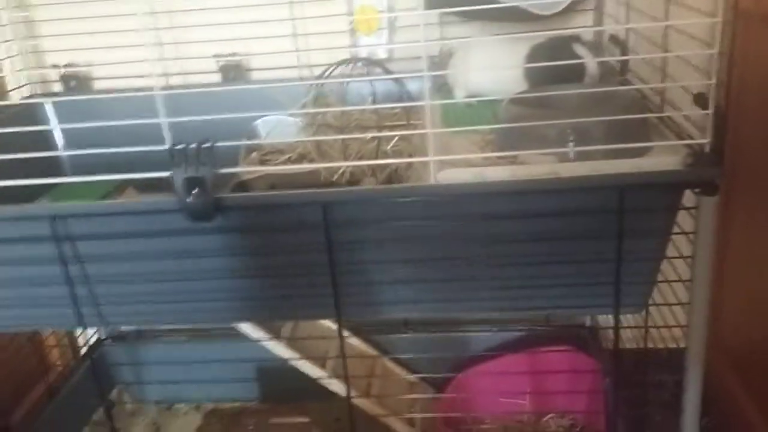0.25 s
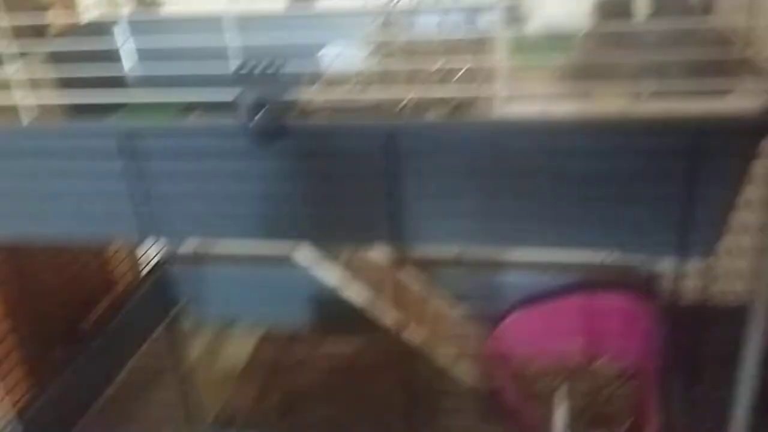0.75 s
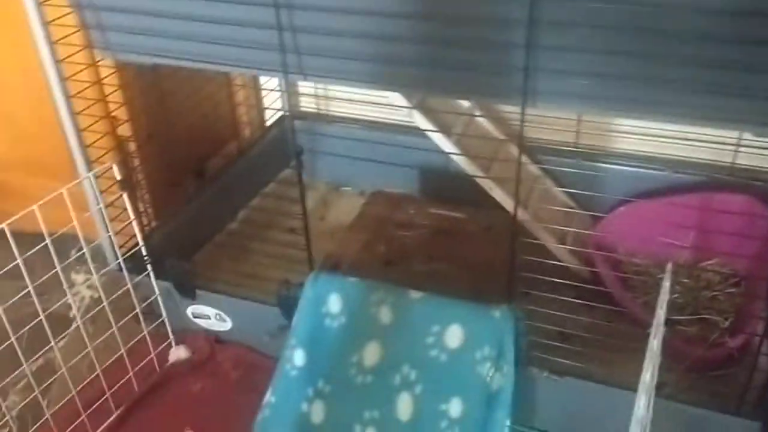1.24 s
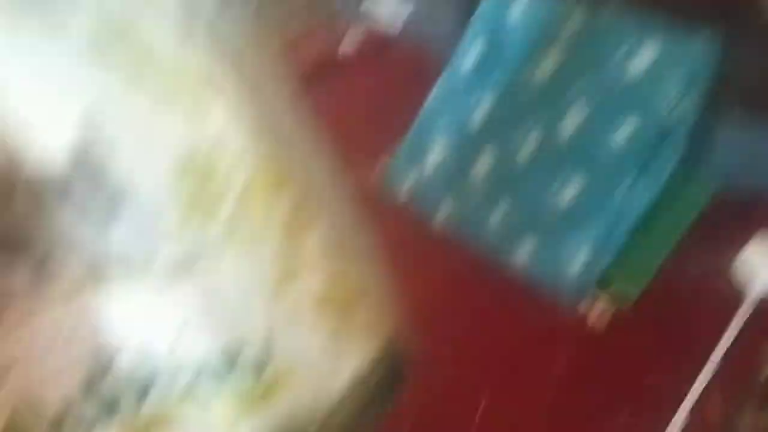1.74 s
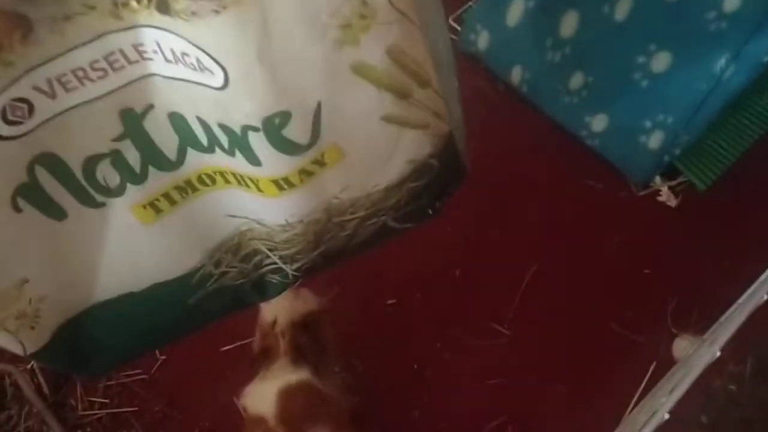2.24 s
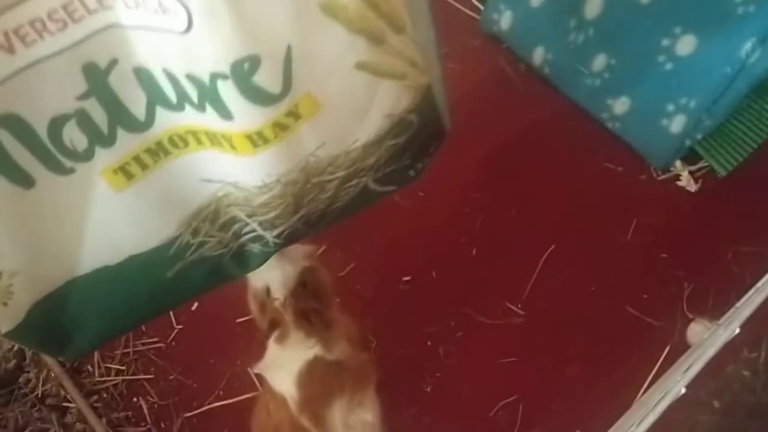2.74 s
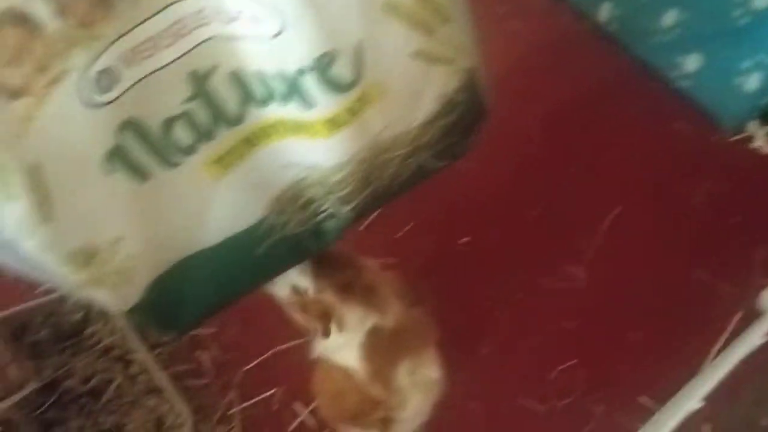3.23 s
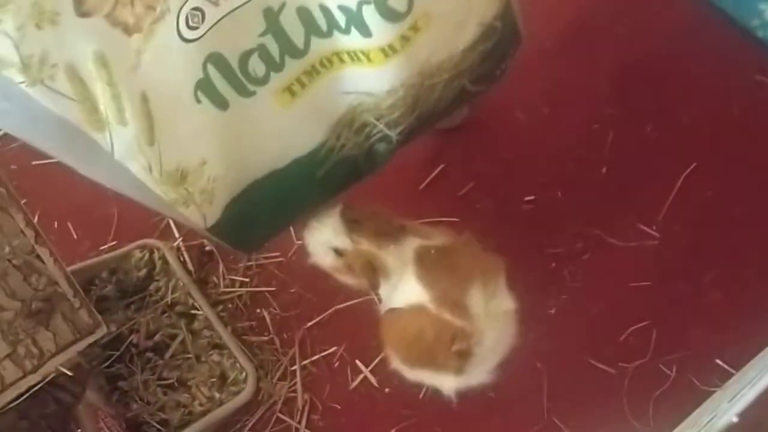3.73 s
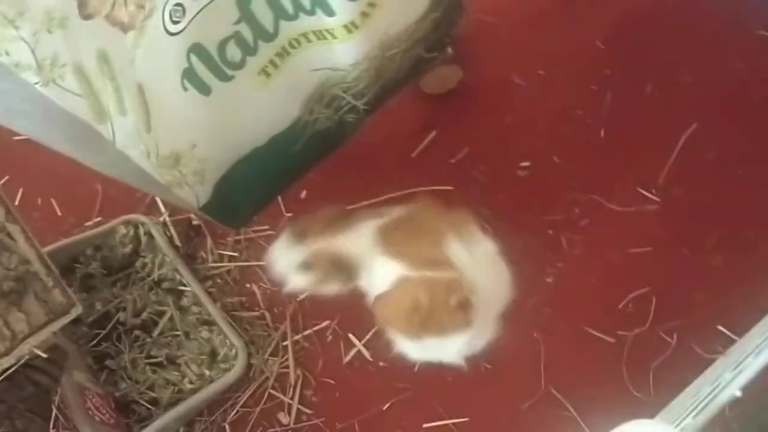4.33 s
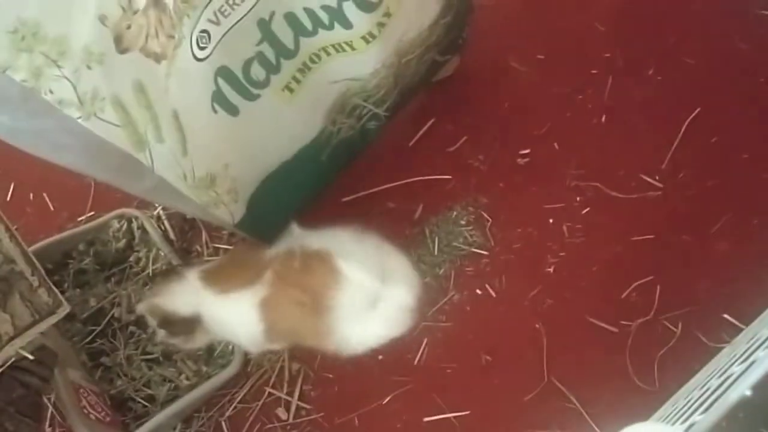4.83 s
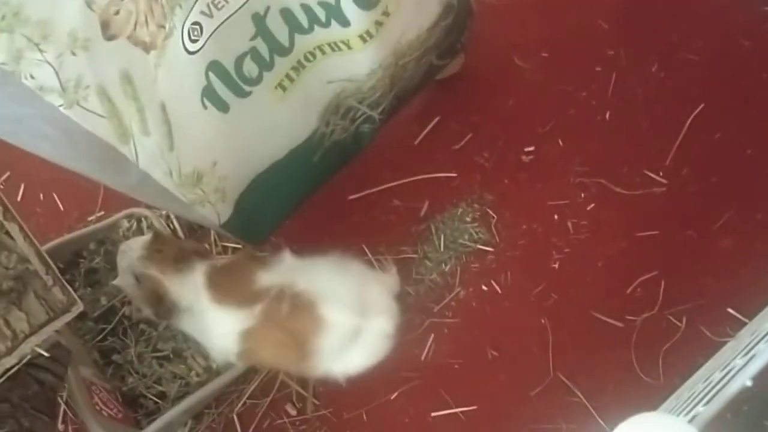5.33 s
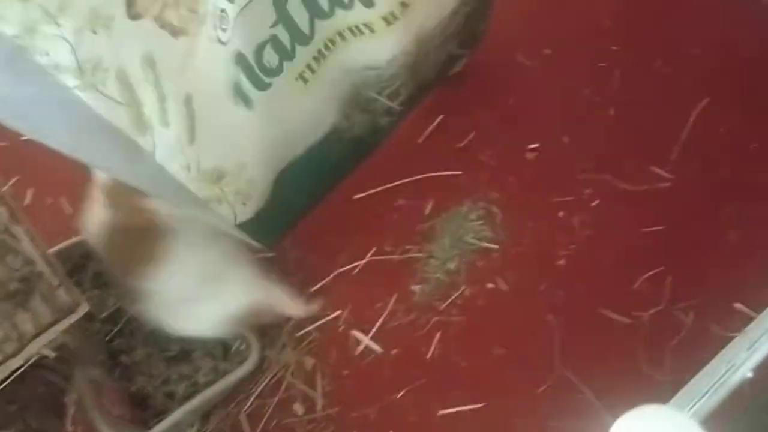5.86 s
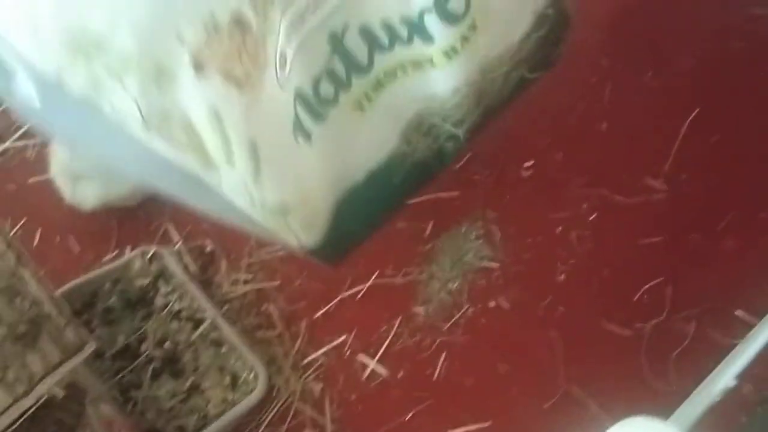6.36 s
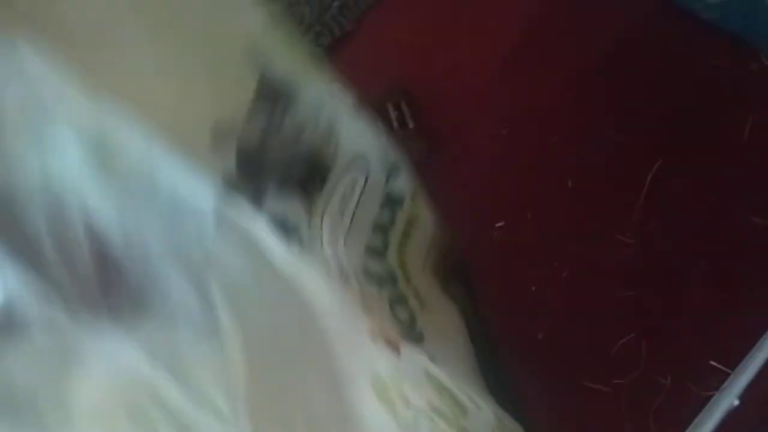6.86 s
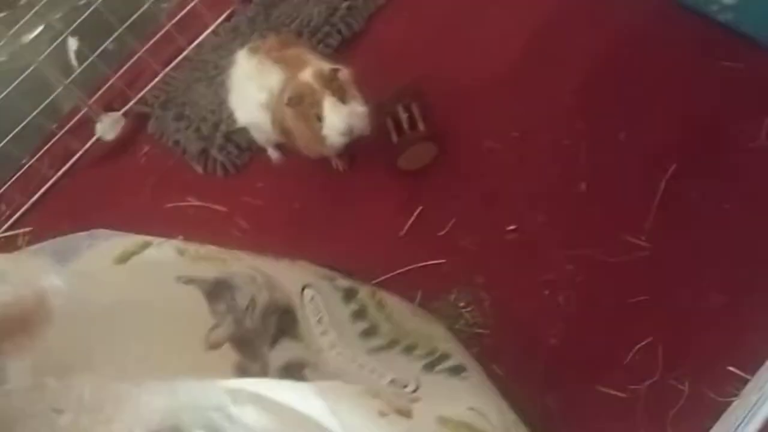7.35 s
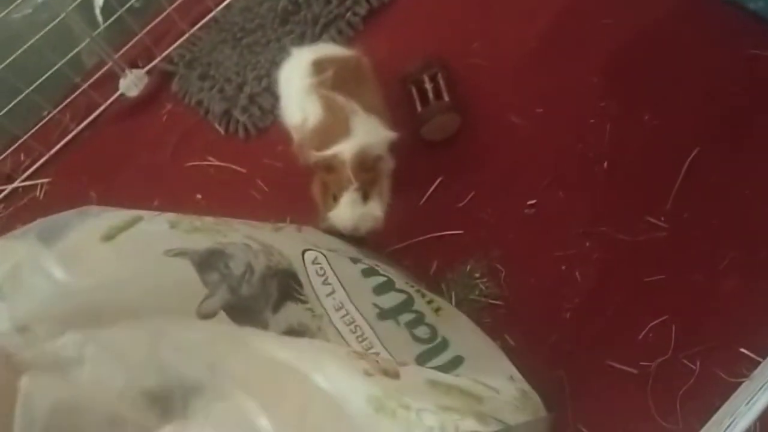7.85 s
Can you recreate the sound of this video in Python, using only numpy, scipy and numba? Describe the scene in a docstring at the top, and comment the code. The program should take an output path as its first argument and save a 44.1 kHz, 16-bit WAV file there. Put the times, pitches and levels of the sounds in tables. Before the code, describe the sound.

A hand-held phone, indoors in a bare room with a short echo. From 0 to 0.65 s, a plastic bag of hay rustles loudly and close, full of sharp dry snaps; it fades by about 0.8 s, leaving near silence over very faint background noise, with small knocks and scuffs until 2 s. Two low, weak grunting calls come at 1.65 and 1.9 s. From 2.4 to 5.6 s, guinea pigs wheek every 0.3 to 0.5 s, each a hoarse grunt sweeping up into a thin whistle that often flips higher; those around 2.5 to 3.5 s are strongest, several later ones fainter. Faint rustling lies underneath. From 5.6 s duller handling and crackles return, with calls at 6.6 and 7.0 s. At 7.15 to 7.3 s the film rasps harshly beside the microphone in two pulls, then bright rustling continues to 8.1 s, with a last squeal at 7.65 s.

```python
"""Hay and a plastic bag rustle and crackle close to a hand-held phone, with soft bumps on the cage floor.
Guinea pigs then wheek for food in a bare, echoing room: harmonics glide up from a hoarse low grunt
to a whistle, which in most calls flips into a higher register. More handling joins in under the calls.
Late on, the bag's film rasps loudly beside the microphone in two stick-slip pulls; then handling and
a last call follow. The echo is decaying noise, and a faint coloured noise lies under everything."""
import sys
import numpy as np
from scipy import signal
from scipy.fft import rfft, irfft, next_fast_len
from scipy.io import wavfile
from scipy.ndimage import uniform_filter1d
from numba import njit

SR = 44100
rng = np.random.default_rng(int(sys.argv[2]) if len(sys.argv) > 2 else 0)


def persist_wave(psi):
    """Save psi, clipped to +-1, as 16-bit WAV."""
    counts = np.round(np.clip(psi, -1, 1) * 32767).astype(np.int16)
    wavfile.write(sys.argv[1], SR, np.atleast_2d(counts).T)


N = 356989
T = np.arange(N) / SR
TOP_HZ = 15700  # nothing sounds above this


def undb(db):
    """Decibels to gain."""
    return 10 ** (np.asarray(db) / 20)


def unit(x):
    """Scale to rms 1."""
    return x / np.sqrt(np.mean(x ** 2))


def at_hz(points, hz):
    """Read (frequency [Hz], value) points on a log-frequency axis."""
    f, value = np.transpose(points)
    return np.interp(np.log(np.maximum(hz, 1)), np.log(f), value)


def colour(x, points):
    """Minimum-phase filter with the given (frequency [Hz], level [dB]) response, made by folding its cepstrum."""
    size = next_fast_len(x.shape[-1] + 4096, True) // 2 * 2
    log_gain = np.log(undb(at_hz(points, np.fft.rfftfreq(size, 1 / SR))))
    cepstrum = irfft(log_gain)
    cepstrum[1:size // 2] *= 2
    cepstrum[size // 2 + 1:] = 0
    response = np.exp(rfft(cepstrum))
    return irfft(rfft(x, size) * response)[..., :x.shape[-1]]


def band(x, lo_hz, hi_hz):
    """Gentle band-pass."""
    edges_hz = [lo_hz, min(hi_hz, SR / 2 - 1)]
    return signal.sosfilt(signal.butter(2, edges_hz, "band", fs=SR, output="sos"), x)


def controls(rows, fade_s):
    """Start time, edge fade and each column of a curve, sample by sample."""
    s, *columns = np.transpose(rows)
    t = np.arange(s[0], s[-1], 1 / SR)
    fade = np.clip(np.minimum(t - t[0], t[-1] - t) / fade_s, 0, 1)
    return (s[0], fade, *(np.interp(t, s, c) for c in columns))


def wander(count, rate):
    """Smooth random motion of rms 1, with `rate` turning points drawn per second."""
    knots = rng.standard_normal(int(count / SR * rate) + 2)
    return unit(np.interp(np.arange(count) / SR * rate, np.arange(len(knots)), knots))


def add(out, x, s, pan_db=0, lag_ms=0):
    """Mix a sound into both channels at time s; pan is left minus right, lag is how late the left is."""
    for channel, side in zip(out, (1, -1)):
        start = max(int((s + side * lag_ms / 2000) * SR), 0)
        part = x[:max(N - start, 0)]
        channel[start:start + len(part)] += part * undb(side * pan_db / 2)


def diffuse(count, alike_hz=550):
    """Noise from all sides: the bass is alike in both channels, the treble unrelated."""
    mid, side = rfft(rng.standard_normal((2, count)))
    alike = 1 / (1 + (np.fft.rfftfreq(count, 1 / SR) / alike_hz) ** 2)
    common = mid * np.sqrt(1 + alike)
    opposed = np.outer([1, -1], side * np.sqrt(1 - alike))
    return irfft(common + opposed, count) / np.sqrt(2)


# colour of the faint background: (frequency [Hz], level [dB])
QUIET_COLOUR = [(18, -45.5), (30, -22), (292, -3), (479, -9), (691, -23.5), (1590, -18), (4910, -23),
                (15500, -26)]


def quiet(level_db=-73):
    """Steady coloured noise from all sides, too faint to notice until the rest falls silent."""
    return unit(colour(diffuse(N), QUIET_COLOUR)) * undb(level_db)


# handling of hay and bag, one curve per stretch:
# (time [s], level of the body before the rustle trim [dB], treble boost [dB])
HANDLING = [
    [(0.0, -26.5, 0.5), (0.062, -38, 3.5), (0.102, -26.5, -0.5), (0.132, -34, -2), (0.418, -35, 0),
     (0.436, -29.5, -5), (0.64, -36.5, -1.5), (0.784, -57.5, 3.5), (0.806, -50.5, 3.5), (1.024, -65.5, 4),
     (1.056, -96, -6), (1.216, -93.5, 9), (1.234, -88, 0), (1.304, -75, -1), (1.408, -56.5, -6),
     (1.5, -73, -13), (1.524, -101, -9), (1.6, -72, 20)],
    [(2.22, -80.5, 3), (2.7, -70.5, 9), (2.83, -60, 10.5), (3.2, -62.5, 13), (3.62, -59, 13),
     (3.95, -68.5, 4), (4.65, -71.5, -3), (5.0, -53, -3), (5.42, -57.5, -2)],
    [(5.6, -50.5, -6), (5.69, -45.5, -8), (5.784, -55.5, 7), (5.812, -42.5, 5), (5.9, -35.5, 0.5),
     (5.912, -32.5, -2), (5.95, -36, 2), (5.992, -29.5, -0.5), (6.008, -34.5, -1), (6.29, -38.5, 0),
     (6.324, -54, 7), (6.402, -40.5, 1.5), (6.436, -47.5, 5), (6.48, -34.5, -4), (6.634, -56, 13),
     (6.664, -37, -8), (6.718, -60.5, 26), (6.742, -34.5, 7.5), (6.788, -48, -2), (6.912, -37.5, 5),
     (7.012, -58, 15), (7.078, -40, 11.5), (7.14, -49, 9), (7.15, -34, -8)],
    [(7.3, -43, 11), (7.328, -43, -2.5), (7.618, -35, 4), (7.676, -42.5, 6), (7.688, -36.5, 2),
     (7.836, -48.5, 5), (7.866, -37, 4.5), (8.01, -43, 0.5), (8.022, -33, 5.5), (8.09, -35.5, -8)],
]
# colour of each stretch: (frequency [Hz], level [dB])
RUSTLE_COLOURS = [
    [(24, -79), (40, -29), (129, -6), (235, -1), (266, 4), (535, -1.5), (637, -10), (859, -2), (1640, -6),
     (2920, -20.5), (3900, -11.5), (4920, -23.5), (7710, -21.5), (14400, -33), (15500, -46)],
    [(40, -26), (130, -1.5), (300, 6.5), (700, -9.5), (2500, -9), (4000, -8), (5500, -18.5), (10000, -21.5),
     (15500, -37)],
    [(24, -61), (40, -23), (192, 1.5), (235, -0.5), (266, 6), (301, 2), (496, 3.5), (722, -2.5), (881, 0.5),
     (2010, -7), (2510, -12.5), (3930, -13), (4800, -21), (9410, -28.5), (15500, -38.5)],
    [(24, -56.5), (40, -28), (132, -6), (273, 1), (472, -3), (998, -4.5), (1250, -7), (1350, -10.5),
     (1960, -7), (2640, -8), (3470, -10), (4920, -18), (9180, -26), (10900, -32.5), (15500, -38)],
]


def rustle(grains_per_s=1400, spread_db=4.0, rub_db=-10, trim_db=-3.5, stray=0.86):
    """Dense tiny snaps of stalks and film come in clumps over a soft rubbing."""
    out = np.zeros((2, N))
    for stretch, spectrum in zip(HANDLING, RUSTLE_COLOURS):
        s, fade, db, crisp_db = controls(stretch, 0.0009)
        count = len(db)
        clumps = undb(2.7 * wander(count, 69.96))  # spread in dB, turns per second
        # two patches of the bag, heard from different directions
        for lag_ms, weight in ((.27, 0.82), (-.1, stray)):
            sizes = undb(spread_db * np.minimum(rng.exponential(size=count), 5))
            strikes = rng.random(count) < grains_per_s / SR
            snaps = unit(strikes * sizes * rng.choice([-1, 1], count))
            rubbing = undb(rub_db) * rng.standard_normal(count)
            sound = colour((snaps + rubbing) * clumps, spectrum)
            body = band(sound, 120, 1200)
            treble = signal.sosfiltfilt(signal.butter(2, 1600, "high", fs=SR, output="sos"), sound)
            sound = (sound + (undb(crisp_db) - 1) * treble) / np.std(body)
            gain = weight / np.hypot(1, stray) * fade * undb(db + trim_db)
            add(out, sound * gain, s, 0, lag_ms)
    return out


# ringing time of the room: (frequency [Hz], time to fall by 60 dB [s])
ROOM_T60 = [(150, .45), (600, .37), (1400, .35), (2500, .5), (3700, .4), (8000, .36), (15000, .24)]


def room(x, gap_s=0.0022, build_s=0.0016):
    """Diffuse echo of the walls: noise after a short gap, dying at its own pace at each frequency."""
    t = T[:SR]
    f, times, cells = signal.stft(diffuse(len(t)), SR, nperseg=256)
    decay = np.exp(-np.log(1000) * times / at_hz(ROOM_T60, f)[:, None])
    onset = np.clip((t - gap_s) / build_s, 0, 1)
    tail = signal.istft(cells * decay, SR)[1][:, :len(t)] * onset
    tail = tail / np.sqrt(np.sum(tail ** 2) / 2)
    return signal.fftconvolve(x.mean(0)[None], tail, axes=1)[:, :N]


# the loudest creases snapping and stalks breaking: (time [s], peak before the crackle trim [dB],
# treble against body [dB], tail against click [dB])
CRACKLES = [(0.015, -12, -3, -16.5), (0.078, -18, -10, -12), (0.094, -10.5, -8, -11.5),
            (0.108, -19, -5, -17), (.157, -15, -4, -5), (.182, -12, -1, -44), (.198, -16, -9, -14),
            (0.231, -19.5, -16, -17.5), (.248, -12.5, -1, -12), (0.265, -14.5, 2, -5), (.27, -21, -5, -24),
            (0.323, -18, -1, -16), (.328, -10, -3.5, -24), (.346, -23, 2, -22), (0.358, -13, 0, -18),
            (0.37, -14, -1, -13), (.398, -26, 12, -6), (0.412, -19.5, -5, -8), (.422, -13.5, -11, -1),
            (.436, -17, -4, -12), (.441, -12.5, 4, -2), (0.45, -21, -24, -10), (0.516, -17.5, -2, -7),
            (.538, -23, 3, -8), (.578, -18, 4, -22), (0.608, -16, -13, -13), (0.628, -21.5, -9, 0),
            (0.862, -51, -8, -12), (.922, -42, 29, -15), (0.966, -42, 21, -17), (1.825, -32, 36, -19),
            (5.686, -34, -14, -9), (5.71, -30, -16, -10), (5.812, -22.5, -8, -14), (5.879, -21.5, -25, -16),
            (5.911, -21, -20, -26), (5.974, -24.5, -25, -12), (5.984, -22, -15, -13),
            (6.035, -23, -13, -17), (6.144, -22, -15, -4), (6.2, -22, -18, -17.5), (6.348, -31, -14, -10),
            (6.36, -24, -20, -11), (6.391, -31, -11, -14), (6.397, -29, -24, -7), (6.458, -24.5, -20, 5),
            (6.483, -24, -10, -6), (6.487, -30, -7, 0), (6.512, -23.5, -15, -13), (6.569, -33.5, -13, -7),
            (6.662, -27.5, -24, -4), (6.838, -17.5, 21, 3), (7.069, -13, 32, -14.5),
            (7.519, -20.5, 14, -17), (7.553, -15.5, 11, 6), (7.564, -25, 11, 0), (7.61, -30, 13, -6),
            (7.799, -13.5, 31, -22), (8.019, -22.5, 7, 2), (8.033, -20, -7, 0), (8.046, -19.5, -9, -3)]
# ring of one crease before its pitch shift: (frequency [Hz], level [dB])
CREASE = [(150, -32.5), (500, -2), (1200, -3), (2200, 3), (3100, 8.5), (4200, -4), (5500, -14), (9000, -30),
          (15000, -38.5)]
# duller creases ring lower, and no two ring alike
CREASE_OCTAVES_PER_DB, CREASE_SPREAD_OCTAVES = .016, .15


def crackles(settle_s=0.0021, trim_db=-1, count=2048):
    """A crease flips with one sharp click, then the film settles; each rings at its own pitch."""
    out, t = np.zeros((2, N)), T[:count]
    for s, db, treble_db, tail_db in list(CRACKLES) + small_crackles():
        settling = undb(tail_db) * rng.standard_normal(count) * np.exp(-t / settle_s)
        push = (t == 0) + settling
        octaves = CREASE_OCTAVES_PER_DB * min(treble_db, 0) + CREASE_SPREAD_OCTAVES * rng.uniform(-0.78, 1)
        ring = colour(push, [(hz * 2 ** octaves, level) for hz, level in CREASE])
        click = colour(ring, [(3000, 0.0018), (9000, treble_db)])
        add(out, click / np.abs(click).max() * undb(db + trim_db), s, 1.5, .2)
    return out


def small_crackles(per_s=16, above_db=4, scatter_db=3, treble_db=0, tail_db=-18):
    """Random lesser snaps whose peaks follow the handling level at that moment; rows as in CRACKLES."""
    rows = []
    for stretch in HANDLING:
        s, db, _ = np.transpose(stretch)
        length_s = s[-1] - s[0]
        for place, size, bright in rng.random((int(per_s * length_s), 3)):
            when = s[0] + place * length_s
            peak_db = np.interp(when, s, db) + above_db + scatter_db * (2 * size - 1)
            rows.append((when, peak_db, treble_db + 10 * (2 * bright - 1), tail_db))
    return rows


# bumps and scuffs on the cage floor: (time [s], peak [dB], ring [Hz], decay [s], rise [s])
BUMPS = [(0.796, -39, 1123, 0.033, 0.0039), (1.23, -58.5, 513, .01, 0.00089),
         (1.35, -58, 3750, 0.066, 0.11), (1.389, -52.5, 418, 0.029, 0.023),
         (1.638, -45.5, 436, 0.0025, 0.0004), (1.915, -39, 436, 0.009, 0.0009),
         (1.722, -43.5, 244, 0.01, .004), (1.997, -52.5, 110, 0.08, 0.0065),
         (5.909, -26, 865, 0.0042, .0005), (6.076, -33, 620, 0.0028, 0.00056),
         (6.831, -48, 114, 0.042, .005)]


def bumps(count=16384):
    """Dull knocks and soft scuffs: narrow bands of noise that swell and fade."""
    out, t = np.zeros((2, N)), T[:count]
    for s, db, hz, decay_s, rise_s in BUMPS:
        shape = (1 - np.exp(-t / rise_s)) ** 2 * np.exp(-t / decay_s)
        knock = band(rng.standard_normal(count) * shape, hz / 1.33, hz * 1.12)
        add(out, knock / np.abs(knock).max() * undb(db), s, 0, .2)
    return out


# one row per call: (time [s], grunt length [s], whistle length [s], upper register length [s],
# start pitch [Hz], pitch where the whistle sets in [Hz], pitch at the break [Hz],
# pitch after the flip [Hz], top pitch [Hz], last flick [Hz], lateness of the grunt's climb [1 = early],
# grunt level [dB], whistle level [dB], whistle growth [dB], upper register level [dB],
# hoarseness [factor], left minus right [dB], left lag [ms], treble [dB])
WHEEKS = [ (1.653, 0.16, 0.0069, .002, 657.7, 1408, 1500, 1500, 1500, 0, 2.3, -46.5, -51, 5, -52, 0.98, -2, -.12, -14),
          (1.915, 0.16, 0.014, 0.016, 818, 1590, 1660, 1720, 1730, -3, 3.3, -46.5, -53.5, 10, -56, 1.19, 1, -0.16, -8),
          (2.405, 0.18, 0.055, .1, 628, 2050, 2770, 3057, 3666, 312, 2, -50.5, -32.5, 7.5, -33, 1.39, -1, -.32, 1.5),
          (2.854, 0.18, 0.045, 0.025, 734, 2335, 2673, 3480, 3920, 0, 2.1, -43, -28, 7.5, -35, 0.71, 1.5, -.32, 2.5),
          (3.235, .19, .038, 0.075, 641, 2160, 2610, 3240, 3953, 0, 2.2, -48, -29, -2, -38, 1.51, 1.5, -.32, 2),
          (3.646, 0.17, 0.013, 0.04, 622, 2200, 2450, 3040, 3900, 15, 2.9, -49.5, -44.5, 6, -48.5, 1.13, 4.5, -0.243, -4.5),
          (4.007, 0.15, 0.015, 0.036, 644.4, 2400, 2800, 3300, 3340, 0, 4, -50.5, -51, 4, -52, 1.3, 0.5, .42, -5),
          (4.366, 0.15, 0.011, 0.03, 610, 2250, 2850, 3000, 3590, 0, 4.2, -53, -57, 3, -55.5, 1.5, 1, .35, -6.5),
          (4.693, .16, 0.033, 0.043, 597, 1986, 2412, 3500, 4040, 0, 2.7, -48, -40, 11, -38, 1.45, 1, .37, 2),
          (5.056, .193, 0.011, 0.0315, 610, 2140, 2720, 3080, 3860, 0, 3.4, -50, -44.5, -2, -49, 1.36, 1.5, .35, -5),
          (5.412, 0.16, 0.021, 0.08, 612.3, 1910, 2456, 2960, 3955, 2, 2.5, -49, -37, 12.5, -37.5, 1.31, 0.5, 0.41, 3.5),
          (6.615, .13, 0.043, 0.052, 1280, 2118, 2620, 3430, 4024, 0, 2.3, -52.5, -30.5, 6, -34.5, 0.68, 2, .36, 0.5),
          (7.015, .21, 0.081, 0.058, 1343, 2312, 2527, 3720, 3995, 0, 5.5, -51.5, -35.5, -1, -36.5, 0.28, 4, .2, 1.5),
          (7.630, 0.12, 0.046, 0.054, 1347, 2042, 2560, 3210, 3914, 0, 2.8, -46, -35.5, -2, -38, 0.85, 4, .36, 5)]
# throat and mouth response: (frequency [Hz], level [dB])
THROAT = [(350, -2), (800, 5), (1400, 3.5), (2000, -1.5), (2500, 7.5), (3000, 1), (3500, 0), (4050, -1),
          (4600, -6.5), (5900, -13.5), (6800, -1), (7700, 11.5), (8700, 5), (10500, -4), (12000, -29),
          (14500, -3)]
# hoarse breath of a grunt: (frequency [Hz], level [dB])
BREATHY = [(60, -26.5), (130, -8), (250, -4), (450, 3), (800, -16.5), (1350, 4.5), (1900, -6.5),
           (2600, -19.5), (3600, -14), (4800, -19), (8000, -20.5), (15500, -28)]
# the voice clears as it rises, before each call's own hoarseness factor:
# (pitch [Hz], hoarse noise against tone [dB], pitch jitter [share])
HOARSENESS = [(400, -4, .05), (800, -7, .034), (1400, -12, .017), (2200, -32, .011), (4000, -38, .006)]
# low notes are buzzier: (pitch [Hz], harmonic slope [dB per octave])
BUZZ = [(500, -3), (1200, -3), (1800, -5.5), (2400, -12), (3500, -8)]
# air hissing past the whistle: (frequency [Hz], level [dB])
HISS_COLOUR = [(900, -28.5), (1700, -16.5), (2400, 4), (3700, -4), (4600, -11), (6000, -7), (7500, -8),
               (9500, -4), (12000, -16), (15500, -7)]
HISS_DB = -20.5  # against the tone
# below this pitch strong and weak cycles alternate, reaching full depth an octave lower
DOUBLING_HZ, DOUBLING_DEPTH = 980, 1.24
# the pitch quavers: (share, turns per second)
QUAVER, QUAVER_PER_S = .011, 110
# the voice swells in; the mouth opens over the first part of a call and lets the treble out
ATTACK_S, MOUTH_OPENS_S, SHUT_MOUTH_HZ = .007, 0.054, 1500


def wheeks(shimmer_db=3.0, jitter_rate=420):
    """Gliding harmonics pass fixed throat resonances; low notes are rough, all notes quaver and hiss."""
    out = np.zeros((2, N))
    pitches, noises, jitters = np.transpose(HOARSENESS)
    for s, *shape, rough, pan_db, lag_ms, treble_db in WHEEKS:
        fade, hz, db = climb(*shape)
        count = len(hz)
        rough = 1 + (rough - 1) * at_hz([(1500, 1), (2200, 0)], hz)
        swell = 1 - np.exp(-T[:count] / ATTACK_S)
        # the voice all but breaks off where the pitch leaps
        octaves_per_s = np.gradient(np.log2(hz)) * SR
        held = uniform_filter1d(1 / (1 + (octaves_per_s / 60) ** 6), size=130)
        jitter = rough * np.interp(hz, pitches, jitters) * wander(count, jitter_rate)
        hz = hz * (1 + jitter + QUAVER * wander(count, QUAVER_PER_S))
        phase = 2 * np.pi * np.cumsum(hz) / SR
        k = np.arange(1, 11)[:, None]  # harmonic numbers
        # grunts carry no top; whistles beam theirs forward
        top_db = treble_db + at_hz([(1150, -19.5), (1750, -0.5)], hz)
        facing_db = at_hz([(4000, 0), (6000, 1)], k * hz) * top_db
        harmonics_db = at_hz(BUZZ, hz) * np.log2(k) + at_hz(THROAT, k * hz) + facing_db
        weights = undb(harmonics_db) * (k * hz < TOP_HZ)
        tone = np.sum(weights * np.sin(k * phase), 0) / np.sqrt(np.sum(weights ** 2, 0) / 2)
        doubling = DOUBLING_DEPTH * np.clip(2 * (1 - hz / DOUBLING_HZ), 0, 1)
        tone = tone * (1 + doubling * np.cos(phase / 2))
        # air escapes once a cycle
        air = unit(colour(rng.standard_normal(count) * (1 + 0.63 * np.cos(phase)), BREATHY))
        share = rough * undb(np.interp(hz, pitches, noises))
        hiss = undb(HISS_DB) * unit(colour(rng.standard_normal(count), HISS_COLOUR))
        voice = (tone + share * air + hiss) / np.sqrt(1 + share ** 2)
        muffled = signal.sosfilt(signal.butter(1, SHUT_MOUTH_HZ, fs=SR, output="sos"), voice)
        voice = voice + np.exp(-T[:count] / MOUTH_OPENS_S) * (muffled - voice)
        flutter_db = rough * shimmer_db * wander(count, 140.3)
        add(out, voice * fade * swell * held * undb(db + flutter_db), s, pan_db, lag_ms)
    return out


# the voice flips between its registers and stops within these times
FLIP_S, RELEASE_S = .005, .008
# late in the grunt the voice moves this share of the way to whistle level; the rest comes at once
LEAD_IN_S, LEAD_IN_SHARE, WHISTLE_ATTACK_S = .055, .38, .004
# the grunt grows as it climbs; the upper register weakens towards its top
GRUNT_GROWTH_DB, UPPER_SAG_DB = 2, 2
# shape of each part's climb (1 = even, more = levels off)
GRUNT_EASE, WHISTLE_EASE, UPPER_EASE = 1.5, 1.1, 2
# a last flick starts this long before the end of the call and takes this long
FLICK_LEAD_S, FLICK_S = .03, 0.0145


def climb(grunt_s, whistle_s, upper_s, start_hz, clear_hz, break_hz, flip_hz, top_hz, flick_hz,
          lateness, grunt_db, whistle_db, growth_db, upper_db):
    """End fade, pitch and level of one call: climbing grunt, sudden whistle, step to the upper register."""
    t = T[:int((grunt_s + whistle_s + upper_s) * SR)]

    def progress(from_s, length_s):
        """Ramp from 0 to 1."""
        return np.clip((t - from_s) / max(length_s, 1 / SR), 0, 1)

    break_s = grunt_s + whistle_s
    grunt = progress(0, grunt_s)
    whistle = progress(grunt_s, whistle_s)
    upper = progress(break_s, upper_s)

    grunt_climb = 1 - (1 - grunt ** lateness) ** GRUNT_EASE
    whistle_climb = 1 - (1 - whistle) ** WHISTLE_EASE
    upper_climb = 1 - (1 - upper) ** UPPER_EASE
    lower_hz = start_hz * (clear_hz / start_hz) ** grunt_climb + (break_hz - clear_hz) * whistle_climb
    flick = flick_hz * progress(t[-1] - FLICK_LEAD_S, FLICK_S)
    upper_hz = flip_hz + (top_hz - flip_hz) * upper_climb + flick

    grunting = grunt_db + GRUNT_GROWTH_DB * (grunt - .5)
    whistling = whistle_db + growth_db * (whistle - .5)
    lead_in = LEAD_IN_SHARE * progress(grunt_s - LEAD_IN_S, LEAD_IN_S)
    effort = lead_in + (1 - LEAD_IN_SHARE) * progress(grunt_s, WHISTLE_ATTACK_S)
    lower_db = grunting + effort * (whistling - grunting)
    high_db = upper_db - UPPER_SAG_DB * (upper - .5)

    flip = progress(break_s - FLIP_S / 2, FLIP_S)
    fade = np.minimum((t[-1] - t) / RELEASE_S, 1)
    return fade, lower_hz + flip * (upper_hz - lower_hz), lower_db + flip * (high_db - lower_db)


# the film rasps in two pulls: (time [s], slip rate [per second], level before the rasp trim [dB],
# fold resonance [Hz], unevenness of the rate [share])
RASPS = [
    [(7.151, 378, -16, 3000, 0.21), (7.165, 560, -21, 3000, 0.37), (7.182, 670, -20, 2320, 0.66),
     (7.2, 750, -19, 1370, 0.66), (7.222, 1000, -27, 1300, 0.65), (7.242, 610, -38, 1200, 0.48)],
    [(7.265, 2100, -34, 2700, 0.1), (7.277, 1450, -26.5, 1990, 0.1), (7.294, 680, -26, 1060, 0.1),
     (7.304, 500, -24.5, 580, 0.03)],
]
# ring of the taut film: (frequency [Hz], level [dB])
FILM = [(30, -55), (100, -32.5), (300, -7.5), (500, -0.5), (1000, -3), (1600, -3.5), (2900, -1.5),
        (3700, -2.5), (4500, -14), (5600, -19), (8000, -13.5), (10000, -12), (15000, -9.5)]


def rasps(scatter_db=2, fold_db=-2, fold_q=2, fizz_db=-7, trim_db=-1, top_pan_db=12):
    """Taut film sticks and slips at a changing rate, while the ring of the loosening fold sinks."""
    out = np.zeros((2, N))
    for pull in RASPS:
        s, fade, rate, db, fold_hz, uneven = controls(pull, .0002)
        count = len(rate)
        turns = np.cumsum(rate * np.exp(uneven * wander(count, 900))) / SR
        sizes = undb(scatter_db * rng.standard_normal(count))
        slips = np.diff(np.floor(turns - .1), prepend=-1) * sizes
        # each slip drags a short fizz behind it
        fizz = unit(rng.standard_normal(count) * np.exp(-3 * ((turns - .1) % 1)))
        film = colour(unit(slips) + undb(fizz_db) * fizz, FILM)
        fold = resonate(film, fold_hz, float(fold_q))
        sound = unit(film + undb(fold_db) * fold) * fade * undb(db + trim_db)
        # the phone's body shades the far port from the highest fizz
        top = signal.sosfiltfilt(signal.butter(3, 10000, "high", fs=SR, output="sos"), sound)
        add(out, sound - top, s, 7, .02)
        add(out, top, s, top_pan_db, .02)
    return out


@njit
def resonate(x, hz, q):
    """State-variable band-pass whose centre moves."""
    y, b, l = np.empty(len(x)), 0., 0.  # output, band-pass state, low-pass state
    for i in range(len(x)):
        g = np.tan(np.pi * hz[i] / SR)
        v = (b + g * (x[i] - l)) / (1 + g * (g + 1 / q))
        b, l, y[i] = 2 * v - b, l + 2 * g * v, v / q
    return y


def scene(voice_room_db=-1, rustle_room_db=-5, rasp_room_db=-13):
    """The animals are further off than the bag, so the room answers them more."""
    handling = rustle() + crackles() + bumps()
    voices, film = wheeks(), rasps()
    # the left channel alone feeds the echo, so the walls hear each source once
    to_walls = undb(rustle_room_db) * handling[:1]
    to_walls = to_walls + undb(voice_room_db) * voices[:1]
    to_walls = to_walls + undb(rasp_room_db) * film[:1]
    return quiet() + handling + room(to_walls) + voices + film


# the two microphone ports differ in colour: (frequency [Hz], left minus right [dB])
PORTS = [(120, 1.5), (500, 0.5), (1100, -0.5), (2500, 10), (4000, 4), (7500, 4.5), (12000, -0.5)]


def record(dry):
    """The two ports differ in colour; the rumble is cut, the loudest peaks are rounded and the top is cut."""
    heard = np.array([colour(x, [(hz, side * db / 2) for hz, db in PORTS])
                      for x, side in zip(dry, (1, -1))])
    heard = signal.sosfilt(signal.butter(2, 55, "high", fs=SR, output="sos"), heard)
    heard = .7 * np.tanh(heard / .7)
    return signal.sosfilt(signal.ellip(10, .2, 80, TOP_HZ, fs=SR, output="sos"), heard)


dry = scene()
out = record(dry)
persist_wave(out)
```